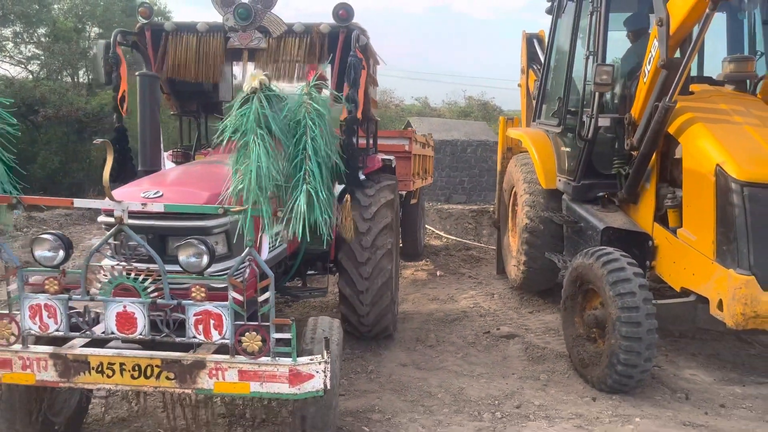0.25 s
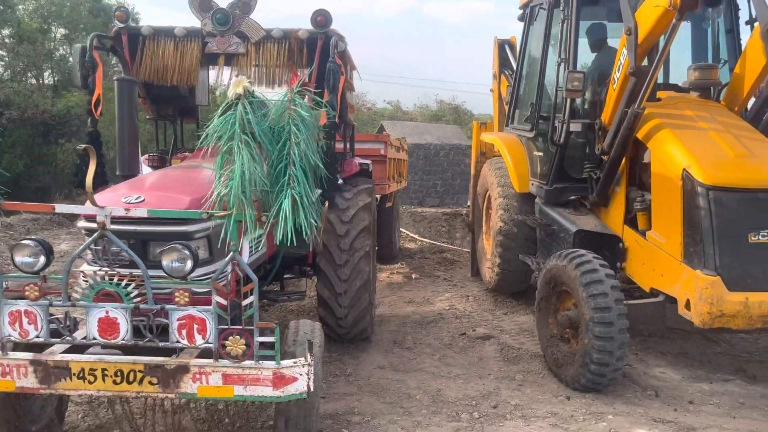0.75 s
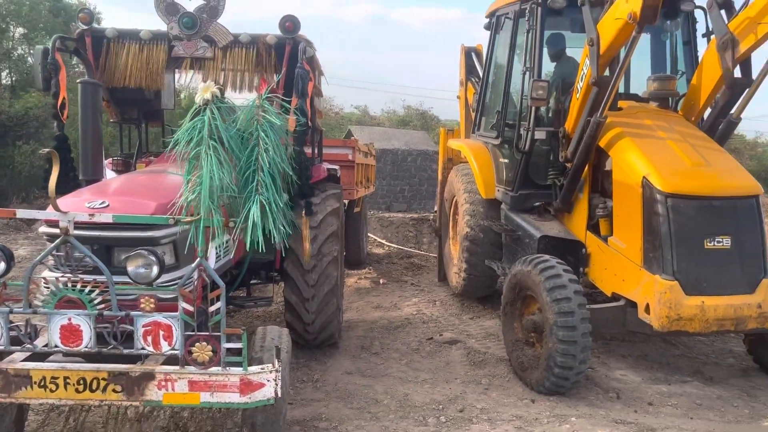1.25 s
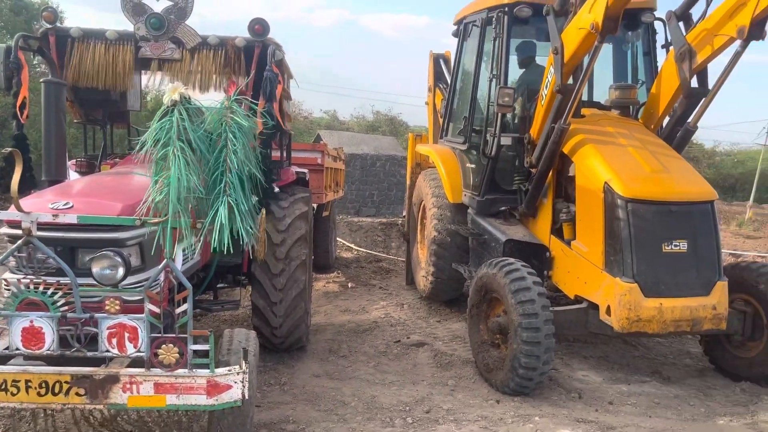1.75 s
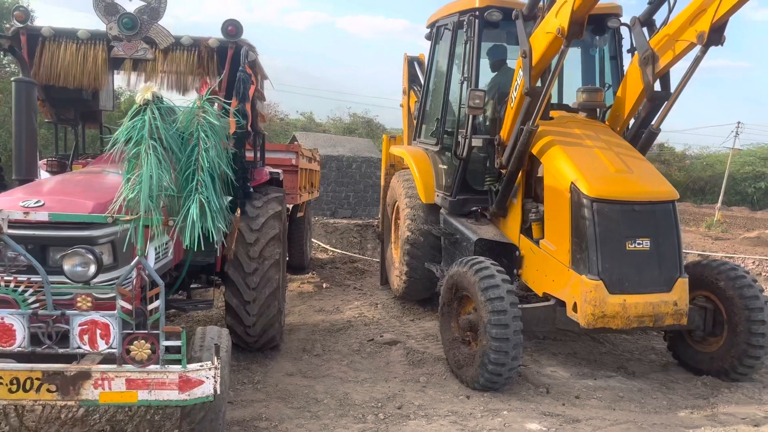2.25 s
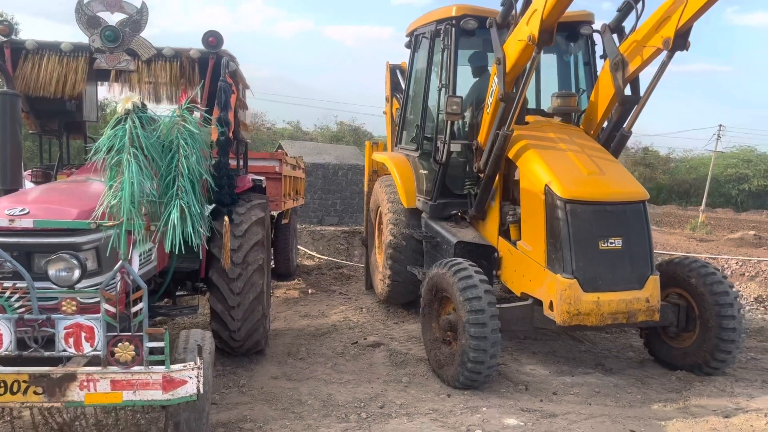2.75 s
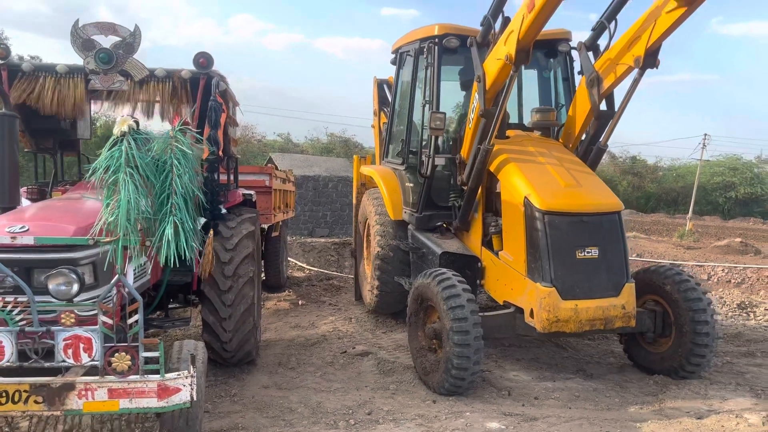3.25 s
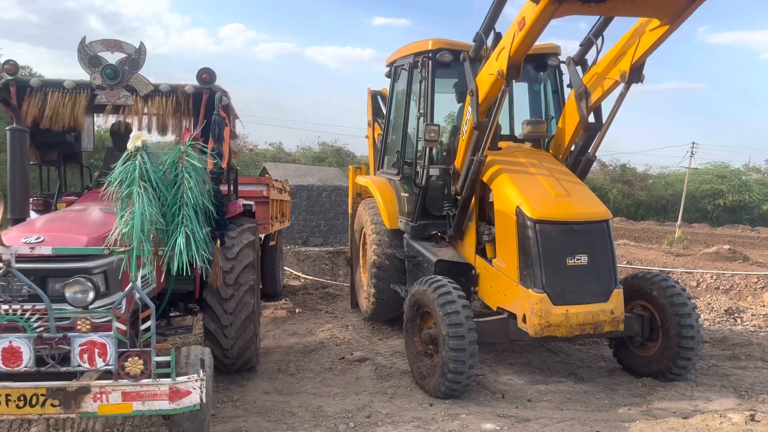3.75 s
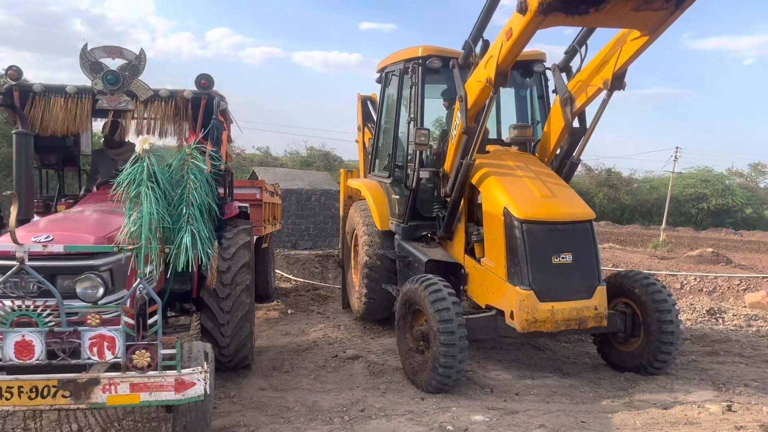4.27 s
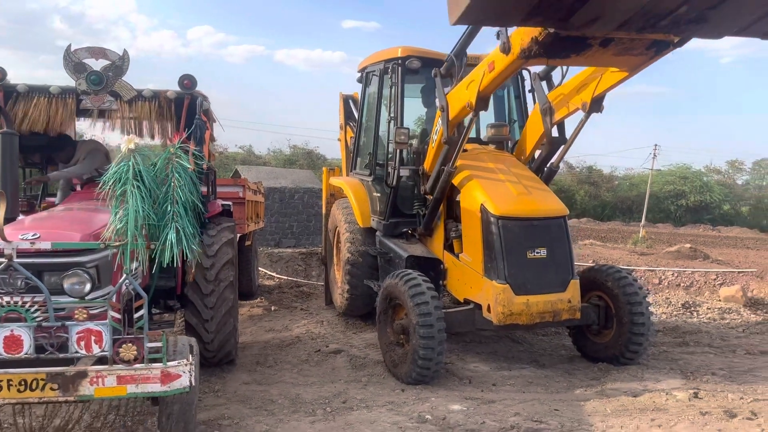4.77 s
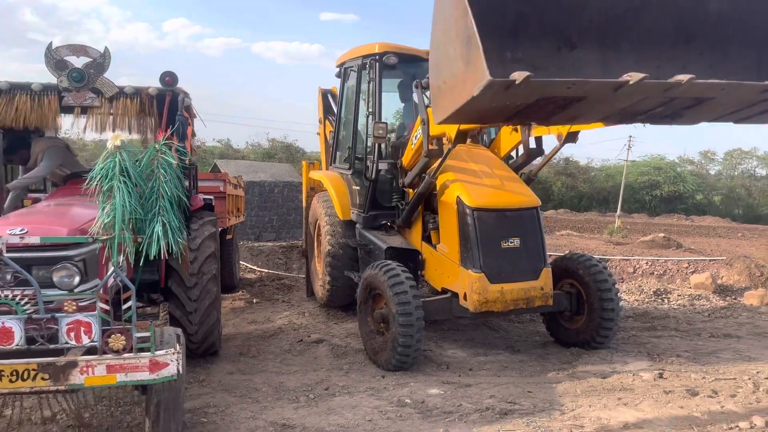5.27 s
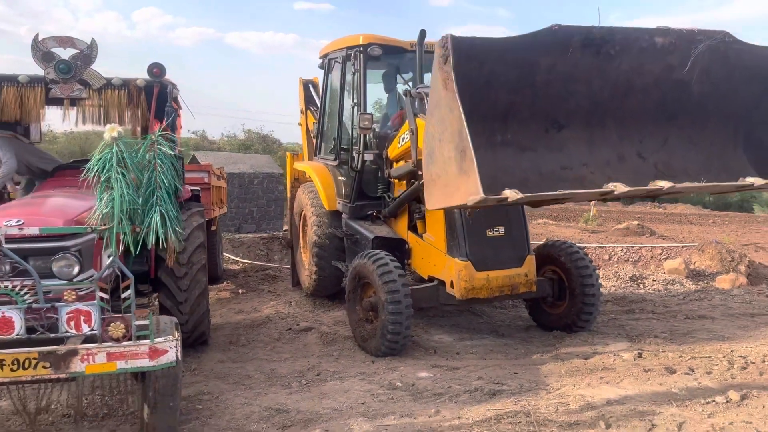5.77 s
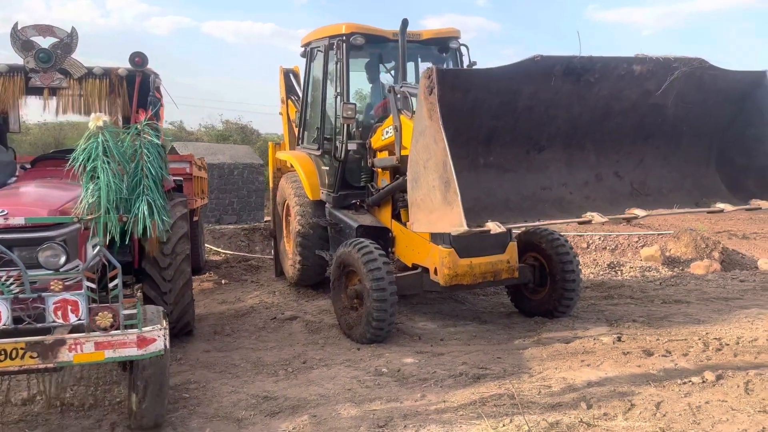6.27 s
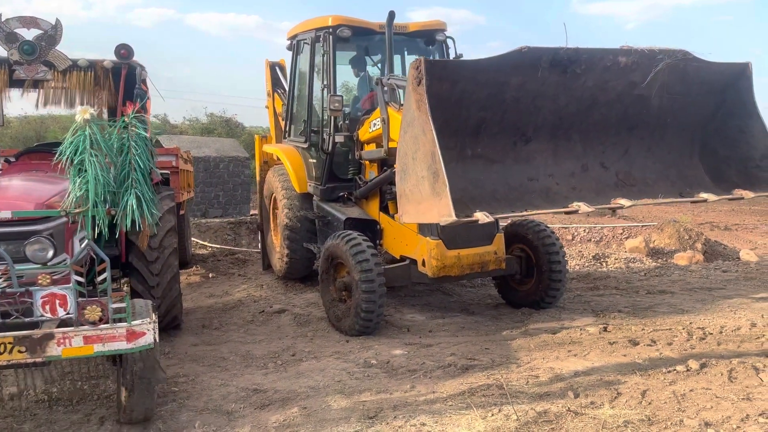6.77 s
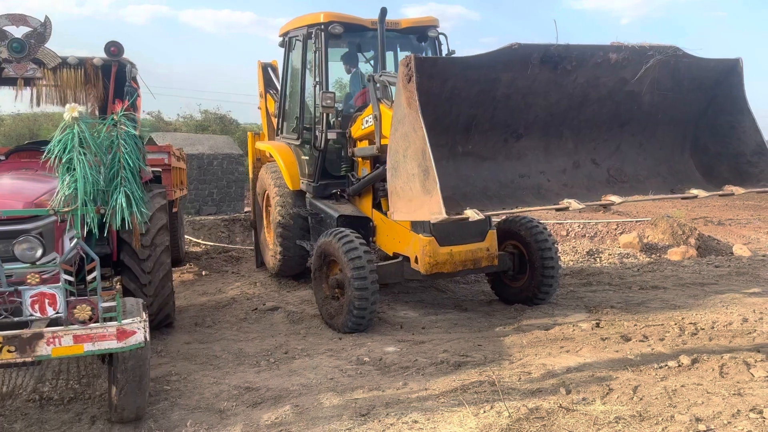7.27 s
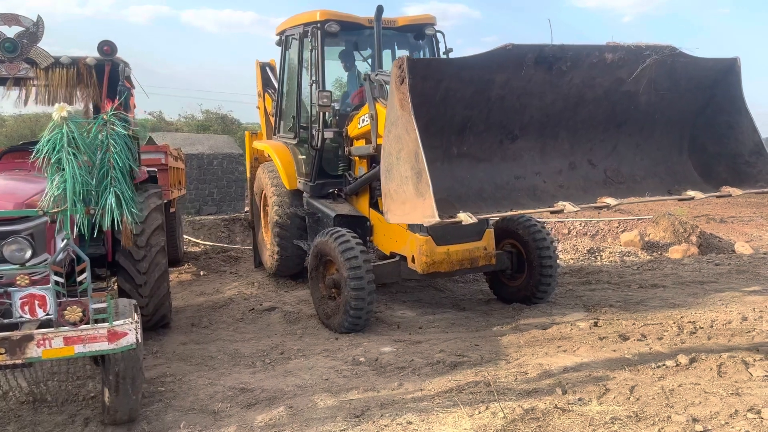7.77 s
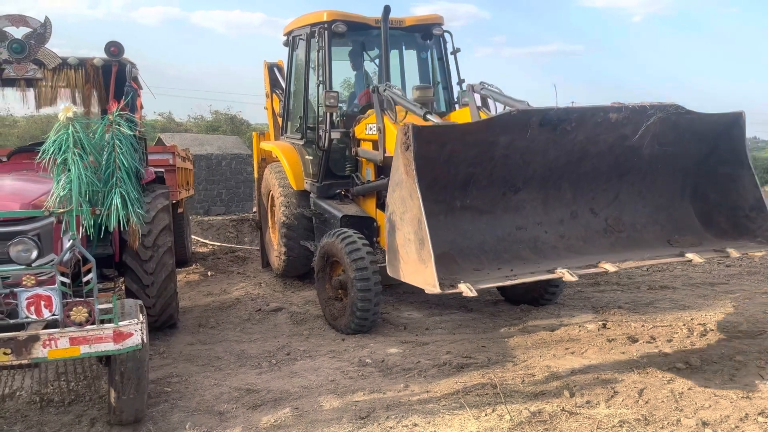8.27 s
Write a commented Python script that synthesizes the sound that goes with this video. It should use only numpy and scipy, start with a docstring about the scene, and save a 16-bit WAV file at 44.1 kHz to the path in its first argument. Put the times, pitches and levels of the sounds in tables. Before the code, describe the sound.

A diesel engine runs down almost to a stall, its valves chattering and steel knocking as it slows. It catches with a few hard barks and a clank, then settles into a thudding, clattering idle. Faint hydraulic tones and a thin squeak come in as the backhoe loader's arms move, followed by several steel clunks. Tiny metal ornaments tinkle on a tractor alongside. Heard from nearby, outdoors on a dirt site.

```python
"""A diesel runs down almost to a stall, catches with a few hard barks and a clank, then settles into
a thudding idle that labours under a hydraulic pump. Each firing knocks in the block and puffs out
of the exhaust. Steel knocks and clunks come from the slowing engine and a backhoe loader; oil sings
in the valves, something squeaks in time with the engine, and the lowered bucket screens the knock.
Small metal trinkets tinkle on a decorated tractor beside the loader."""
import sys
import numpy as np
from scipy.fft import rfft, irfft
from scipy.io import wavfile

SR = 44100
rng = np.random.default_rng(int(sys.argv[2]) if len(sys.argv) > 2 else 0)


def to_wav(sig):
    """Store sig (one row per channel, or 1-D mono) as 16-bit WAV at the path in sys.argv[1].

    Samples outside -1..1 are clipped; the rate is SR.
    """
    pcm = np.clip(np.atleast_2d(sig), -1, 1) * 32767
    pcm = np.round(pcm).astype(np.int16)
    wavfile.write(sys.argv[1], SR, pcm.T)  # frames by channels


N = 375732
TIME = np.arange(N) / SR
FREQS = np.maximum(np.arange(N // 2 + 1) * SR / N, 1)

# engine block resonances: pitch_hz, width_hz, gain_db
BLOCK_RINGS = [(831, 12, 5.5), (1178, 120, 6), (1335, 21, 0.5), (1676, 67, 3), (2320, 100, -13)]


def running_down():
    """Fuel cut: friction slows the diesel steadily; the growl ends and the valve gear chatters."""
    # spectra: freq_hz, gain_db
    body_colour = [(20, -30), (50, 4.5), (110, 3.5), (180, -2.5), (450, 1), (1000, -0.5), (1550, -2.5),
                   (2500, -5), (3400, -10), (4500, -16), (6000, -18.5), (11000, -24.5), (15000, -28)]
    growl_colour = [(40, -20), (130, -16), (250, 2), (600, -1), (1000, -7), (1300, 0.5), (1550, -11),
                    (3000, -9), (6000, -24)]
    valve_colour = [(500, -19), (1700, 5.5), (2600, 3.5), (3200, 1), (3800, -3.5), (5000, -10.5),
                    (6500, -14), (12000, -52)]
    drone_colour = [(30, -1), (60, 1.5), (100, 3), (150, 1), (250, 2.5)]
    # resonances: pitch_hz, width_hz, gain_db
    body_rings = [(362, 18, -9), (636, 42, 1), (900, 16, 6.5), (1157, 26, 8.5), (1275, 15, 3.5)]
    growl_rings = [(357, 31, 0.5), (480, 13, -11), (634, 60, 6.5), (910, 7.8, 18.5), (1210, 34, 2),
                   (1287, 26, 7.5)]
    valve_rings = [(1784, 43, -3), (2230, 62, -6.5), (2714, 81, 0.5), (3025, 27, -1), (3160, 80, 7),
                   (3340, 54, 2), (3480, 38, 5), (3840, 37, 4), (4970, 87, -12.5), (5220, 52, -10),
                   (5700, 35, -30)]
    # harmonics 1-6 of the compression rate: level_db
    orders_db = [-19, -12.5, -12, -16.5, -16, -18.5]
    # stereo curves: (freq_hz, likeness), (freq_hz, balance_db), (freq_hz, left_lead_rad)
    image = ([(60, 1), (400, .88), (1200, .8), (1550, .6), (2400, .7), (4500, .45), (6500, .5), (8000, .95),
             (15000, .9)], [(100, 0), (600, 2.5), (1400, 0), (3100, 6), (6000, 2), (8000, 0)], [(100, 0),
             (1210, .7), (1550, 2.6), (1810, .4), (3450, 1.6), (4300, 1.8), (4700, .3), (6600, -.9),
             (7800, -3), (9000, -3.3), (10800, -6), (13000, -6.5), (14700, -9.2)])
    full_hz, crawl_hz, cut_s, loss_hz_per_s = 34.7, 8, 0.485, 16.76
    rate_hz = np.clip(full_hz - loss_hz_per_s * (TIME - cut_s), crawl_hz, full_hz)
    phase, speed = np.cumsum(rate_hz) / SR, rate_hz / full_hz
    fuel = 1 - ramp(cut_s, 0.32)
    depth = 0.56 - 0.11 * speed  # single compressions stand out as it slows
    beat = depth * (rms_one(each_cycle(phase, rise=0.25, uneven_db=0.7)) ** 2 - 1)
    body = response(body_colour, body_rings + valve_rings)
    treble = 1 / (1 + (1500 / FREQS) ** 4)
    clatter = through(np.sqrt(1 + beat) * grit(grain_db=0.2), body * np.sqrt(treble))
    roar = through(np.sqrt(1 + 0.5 * beat) * grit(grain_db=1), body * np.sqrt(1 - treble))
    combustion = engine_grit(phase, rate_hz, cylinders=1, alike=0.7, grain_db=1)
    growl = through(combustion, response(growl_colour, growl_rings + valve_rings))
    valve_gear = response(valve_colour, [(hz, width, db + 6.5) for hz, width, db in valve_rings])
    taps = each_cycle(phase - 0.08, rise=0.17, uneven_db=0.6) * grit(grain_db=1.2)
    chatter = through(rms_one(taps), valve_gear)
    orders = sum(from_db(db + 2 * drift(9.6))
                 * np.sin(2 * np.pi * (k * (phase + 0.031 * drift(25.67)) + rng.random()))
                 for k, db in enumerate(orders_db, 1))
    drone = from_db(-22.5) * speed ** 1.6 * through(orders, response(drone_colour))
    pair = (from_db(-26) * speed ** 0.85 * clatter
            + from_db(-29) * speed ** 0.29 * roar
            + from_db(-28) * fuel * growl
            + from_db(-36.5) * (1 - fuel) * speed ** 0.48 * chatter)
    fade = 1 - ramp(2.34, 0.28)  # the idle takes over
    return fade * (to_stereo(pair, image) + drone)


def catching():
    """Over-fuelled firings bark in the pipe, crack in the block, boom in the silencer, shake panels."""
    # first firings: start_s, bark_db, clank_db, crack_db
    firings = [(2.048, -30, -42, -30), (2.118, -27.5, -29, -28), (2.176, -24.5, -20.5, -24),
               (2.217, -22, -26, -24), (2.259, -21, -18.5, -27), (2.29, -18.5, -17, -22),
               (2.322, -19.5, -8, -25), (2.358, -26, -37, -29)]
    # spectra: freq_hz, gain_db
    bark_colour = [(80, 12), (165, 14.5), (300, 1), (700, -1), (1200, 2), (1900, -11.5), (3500, -13.5),
                   (5500, -17.5), (8000, -22.5), (15000, -29.5)]
    crack_colour = [(300, -12), (900, -4), (1500, 8), (2400, 8), (3300, -8), (5500, -16), (8000, -24),
                    (15000, -32)]
    starts_s, bark_db, clank_db, crack_db = np.transpose(firings)
    rises_s = 0.22 * np.gradient(starts_s)
    bark_env = sum(from_db(db) * burst(TIME - s, rise) for s, db, rise in zip(starts_s, bark_db, rises_s))
    barks = through(bark_env * grit(grain_db=0), response(bark_colour))
    crack_env = sum(from_db(db) * ramp(s, 0.0046) * decay(s, t60_s=0.046)
                    for s, db in zip(starts_s, crack_db))
    cracks = through(crack_env * grit(grain_db=1.5), response(crack_colour, BLOCK_RINGS))
    boom_db = -11 - 16 * np.exp((starts_s[0] - starts_s) / 0.066)  # builds to full strength
    booms = sum(from_db(db) * puff(TIME - s - 0.017, pitch_hz=73.7, length_s=0.061)
                for s, db in zip(starts_s, boom_db))
    softness_db = np.minimum(clank_db.max() - clank_db, 10)
    clanks = sum(clank(*hit) for hit in zip(starts_s, clank_db, softness_db))
    return barks + cracks, booms + clanks


def clank(start_s, level_db, softness_db):
    """The lurching engine strikes the bodywork; softer blows favour the upper modes."""
    # panel modes: pitch_hz, level_db, t60_s
    modes = [(492, 0.5, 0.12), (694, -8, 0.1), (802, -9, 0.097), (1063, -3.5, 0.066), (1222, -7.5, 0.13),
             (1720, -18, 0.081), (2260, -25, 0.079)]
    start = int(start_s * SR)
    age_s = np.maximum(TIME - start_s, 0)[start:start + SR // 2]
    ring = 0
    for hz, db, t60_s in modes:
        tilt_db = 0.17 * softness_db * min(np.log2(hz / modes[0][0]), 1)
        envelope = from_db(db + tilt_db - 60 * age_s / t60_s)
        ring += envelope * np.sin(2 * np.pi * (hz * age_s + rng.random()))
    attack = np.clip(age_s / 0.0029, 0, 1)
    return np.pad(from_db(level_db) * attack * ring, (start, N))[:N]


def idle_motion():
    """Firing rate, firing count and load (0-1), which shows as the pump dragging the speed down."""
    # idle speed: time_s, firing_hz
    speeds = [(2.38, 32.923), (3, 32.258), (3.6, 32.288), (4.2, 31.785), (5.8, 31.65), (6.2, 31.949),
              (8.5, 31.854)]
    free_hz, loaded_hz = 32.3, 31.7
    rate_hz = np.interp(TIME, *np.transpose(speeds))
    phase = np.cumsum(rate_hz * (TIME > speeds[0][0])) / SR
    load = np.clip((free_hz - rate_hz) / (free_hz - loaded_hz), 0, 1)
    return rate_hz, phase, load


def exhaust_thuds(rate_hz, phase, load):
    """One exhaust thud per firing, harder under load; strong and weak cylinders make the idle lope."""
    # thud of each cylinder: level_db
    lope_db = [1.35, -1.55, 0.35, -0.95]
    turn = phase.astype(int)
    strength = from_db(np.resize(lope_db, 600) + 0.65 * rng.standard_normal(600))
    pitch_hz = 74.4 + 4.8 * load  # hotter gas swings faster
    thuds = sum(strength[turn + k] * puff((phase - turn - k - 0.656) / rate_hz, pitch_hz, length_s=0.058)
                for k in (-1, 0, 1))
    fundamental = from_db(-18.5) * np.cos(2 * np.pi * (phase - 0.72))
    hum = from_db(-20.5 - 12.5 * load + 2.3 * drift(7.5)) * np.sin(2 * np.pi * 5 * phase)
    return from_db(-26 + 3 * load) * rms_one((phase > 0) * (thuds + fundamental + hum))


def idle_clatter(rate_hz, phase, load):
    """Ignition crack, block knock, piston slap and pipe rasp per firing, over a wash of gears and fan."""
    # spectra: freq_hz, gain_db
    ignition_colour = [(400, 0), (1000, 0), (1800, 1), (2600, 1.5), (3200, -9), (4400, -8.5), (5600, -21.5),
                       (8000, -19), (15000, -11)]
    knock_colour = [(200, 1), (800, 7), (1400, 2), (2500, 4.5), (3200, -1), (4500, -5.5), (5600, -12.5),
                    (7500, -13.5), (10000, -31), (15000, -18.5)]
    slap_colour = [(200, -37), (480, 11), (850, -10.5), (1200, 2), (1600, -12.5), (4000, -11.5),
                   (8000, -70)]
    rasp_colour = [(20, -26), (45, 9.5), (100, 5), (160, 3.5), (220, 3.5), (400, -2.5), (650, -6.5),
                   (950, -9.5), (1500, -13), (4000, -32)]
    # exhaust pipe resonances: pitch_hz, width_hz, gain_db
    pipe_rings = [(306.4, 7.3, 8.5), (477, 21, 0), (559, 22, 9), (632, 66, -5)]
    # grit that repeats per cylinder: knock_share, slap_share, rasp_share
    shares = [.35, .7, .5]
    running = phase > 0
    knock_grit, slap_grit, rasp_grit = (engine_grit(phase, rate_hz, cylinders=4, alike=share, grain_db=1.4)
                                        for share in shares)
    crack_env = each_cycle(phase + 0.078, rise=0.11, uneven_db=1, pattern_db=[-0.17, 0.5, -0.5, 1])
    knock_env = each_cycle(phase + 0.072, rise=0.24, uneven_db=1.2, pattern_db=[0.14, -1.3, -0.44, 0.57])
    wash = from_db(-0.5) * grit(grain_db=2)
    slap_env = each_cycle(phase - 0.15, rise=0.09, uneven_db=1, pattern_db=[1.5, -1, -1.5, -2.5])
    rasp_env = each_cycle(phase - 0.1, rise=0.35, uneven_db=0.5, pattern_db=[1.5, -1.5, 1, -1])
    bucket_db = -2 * ramp(5.17, 1.6)  # the lowered bucket screens the block
    block = sum(through(from_db(db + bucket_db) * rms_one(running * drive), response(colour, BLOCK_RINGS))
                for drive, db, colour in [(crack_env * knock_grit, -48, ignition_colour),
                                          (knock_env * knock_grit + wash, -38.5, knock_colour),
                                          (slap_env * slap_grit, -42.5, slap_colour)])
    rasp = from_db(-35 - 0.1 * load) * rms_one(running * (rasp_env + from_db(-4)) * rasp_grit)
    return block + through(rasp, response(rasp_colour, pipe_rings))


def steel_clunks():
    """Steel knocks and clunks from the slowing engine and the loader, each followed by a thump."""
    # clunks: start_s, crash_db, t60_s, centre_hz, spread_octaves, thump_db
    hits = [(1.655, -18.5, 0.12, 1390, 0.43, -38), (1.989, -27, 0.042, 1500, 1, -57),
            (2.048, -25, 0.082, 1400, 0.46, -45), (2.77, -41, .08, 5170, 0.27, -55),
            (4.805, -26, .045, 750, 0.88, -54), (6.128, -33.5, 0.19, 1010, 1.1, -31),
            (6.231, -30.5, 0.17, 696, 1.1, -36), (6.627, -33, .13, 900, 0.59, -50),
            (7.219, -25, 0.14, 2040, 0.66, -41), (7.236, -27, 0.24, 700, 1.1, -25.5),
            (8.015, -25.5, 0.048, 700, .7, -52)]
    # steel resonances: pitch_hz, width_hz, gain_db
    steel_rings = [(680, 190, 11), (1017, 30, -6), (1380, 41, 3), (1620, 40, 3), (2180, 30, -1),
                   (3250, 29, -10)]
    crashes, shudder = 0, 0
    for s, db, t60_s, centre_hz, spread_octaves, thump_db in hits:
        colour = [(centre_hz * 2 ** (k * spread_octaves), -3 * k * k) for k in range(-5, 6)]
        envelope = from_db(db) * ramp(s, 0.0039) * decay(s, t60_s)
        crashes += through(envelope * rng.standard_normal((2, N)), response(colour, steel_rings))
        shudder += from_db(thump_db) * decay(s + 0.026, t60_s=0.36)
    return crashes, shudder * unsteady_tone(pitch_hz=160, width_hz=25)


def trinkets(ring_t60_s=0.15, click_t60_s=0.049, reach_hz=350, detune=0.0058):
    """Tiny metal ornaments click together and ring very high; each touch favours a few modes."""
    # clearest touches: start_s, level_db, centre_hz
    touches = [(0.795, -26, 13900), (0.805, -30.5, 10060), (1.071, -30, 9600), (1.2151, -36, 14400),
               (1.679, -34, 10300), (2.0313, -35.5, 14700), (2.4962, -36, 13900), (2.92, -42, 9400),
               (3.3016, -35, 9940), (3.32, -34, 9300), (3.335, -34, 14200), (4.1674, -40, 13800),
               (4.955, -42, 13900), (4.995, -42, 10300), (5.36, -42, 9550), (5.7494, -40, 11300),
               (6.49, -36, 13900), (6.59, -42, 11300), (7.25, -44, 14600), (7.71, -50, 8840),
               (8.4188, -40, 14100)]
    # ornament modes: pitch_hz
    modes_hz = [9220, 9200, 9580, 10210, 10490, 11280, 12140, 13600, 14360, 14700]
    faint_per_s, faint_db = 3.6, -45.5
    faint = [(when * N / SR, faint_db, modes_hz[int(which * len(modes_hz))])
             for when, which in rng.random((int(faint_per_s * N / SR), 2))]
    out, age_s = np.zeros((2, N + SR)), np.arange(SR // 3) / SR
    attack = np.clip(age_s / 0.0046, 0, 1)
    for s, db, centre_hz in touches + faint:
        hz = np.array(modes_hz)[:, None] * (1 + detune * rng.standard_normal())
        favour = np.exp(-((hz - centre_hz) / reach_hz) ** 2 / 2) + from_db(-19)
        weight = favour * from_db(2.4 * rng.standard_normal(hz.shape))
        modes = np.sin(2 * np.pi * (hz * age_s + rng.random((2, len(hz), 1))))
        ring = (weight / np.linalg.norm(weight) * modes).sum(axis=1) * from_db(2 - 60 * age_s / ring_t60_s)
        scrape = np.diff(rng.standard_normal((2, len(age_s) + 2)), 2)
        click = scrape * from_db(-6 - 60 * age_s / click_t60_s)
        start = int(s * SR)
        out[:, start:start + len(age_s)] += from_db(db) * attack * (ring + click)
    return out[:, :N]


def hydraulics():
    """Oil sings through pump and valves in narrow, unsteady tones as the loader arms move."""
    # oil tones: start_s, loudest_s, end_s, pitch_hz, width_hz, level_db
    tones = [(0.56, 0.56, 1.39, 251, 7.4, -37.5), (3, 4.7, 5.9, 847, 8.9, -47),
             (2.4, 3.8, 4.7, 1370, 27, -44), (4.9, 6.7, 8.6, 568, 11, -44.5)]
    return sum(from_db(db) * unsteady_tone(hz, width_hz) * np.interp(TIME, times_s, [0, 1, 0])
               for *times_s, hz, width_hz, db in tones)


def squeak(phase, wander_hz=44.2):
    """A thin metallic squeak pulses with the shake of the engine."""
    # squeak contour: time_s, level_db, pitch_hz
    contour = [(2.9, -69, 4570), (3.3, -56, 4560), (4.2, -53, 4580), (4.35, -46, 4605), (4.5, -44.5, 4610),
               (4.66, -57, 4640), (4.8, -62, 4620), (5.2, -60, 4620), (5.7, -53, 4600), (6.1, -61, 4650),
               (6.8, -60, 4640), (8.5, -57, 4700)]
    times_s, db, hz = np.transpose(contour)
    pulses = each_cycle(phase, rise=0.14, uneven_db=6)
    level_db = np.interp(TIME, times_s, db, left=-np.inf)
    pitch_hz = np.interp(TIME, times_s, hz) + wander_hz * drift(150)
    return from_db(level_db) * pulses * np.sin(2 * np.pi * np.cumsum(pitch_hz) / SR)


def puff(age_s, pitch_hz, length_s):
    """One gas slug swings the silencer for a few cycles, with peak suction at age zero."""
    window = np.cos(np.pi * np.clip(age_s / length_s, -0.5, 0.5)) ** 4.1 * (abs(age_s) < length_s / 2)
    return -np.cos(2 * np.pi * pitch_hz * age_s) * window


def each_cycle(phase, rise, uneven_db, pattern_db=(0,)):
    """One burst of uneven strength per turn of phase, tails overlapping; rise in turns."""
    turn = np.maximum(np.floor(phase), 0).astype(int)
    strength = from_db(np.resize(pattern_db, 600) + uneven_db * rng.standard_normal(600))
    age = phase - turn
    tail = (turn > 0) * strength[turn - 1] * burst(age + 1, rise)
    return np.hypot(strength[turn] * burst(age, rise), tail)


def engine_grit(phase, rate_hz, cylinders, alike, grain_db):
    """Grit whose share `alike` repeats whenever the same cylinder fires, giving the engine orders."""
    stroke = int(SR / rate_hz.max())
    size = cylinders * stroke
    imprint = rms_one(irfft(np.exp(2j * np.pi * rng.random((2, size // 2 + 1))), size))
    place = (np.floor(phase) * stroke + phase % 1 * SR / rate_hz).astype(int) % size
    return np.sqrt(alike) * imprint[:, place] + np.sqrt(1 - alike) * grit(grain_db)


def grit(grain_db):
    """Two independent noises of tiny, uneven impacts; unit rms."""
    noise = rng.standard_normal((2, N))
    grains = np.repeat(rng.standard_normal(N // 32 + 1), 32)[:N]
    return rms_one(noise * from_db(grain_db * grains))


def unsteady_tone(pitch_hz, width_hz):
    """Noise in one narrow resonance; unit rms."""
    return rms_one(through(rng.standard_normal(N), 1 / (1 + ((FREQS - pitch_hz) / width_hz) ** 2)))


def burst(age, rise):
    """Swells to one at `rise`, then dies away."""
    u = np.maximum(age, 0) / rise
    return u * np.exp(1 - u)


def decay(start_s, t60_s):
    """Sudden onset, exponential fall."""
    age_s = TIME - start_s
    return (age_s > 0) * from_db(-60 * np.clip(age_s / t60_s, 0, 4))


def ramp(start_s, length_s):
    """Linear rise from zero to one."""
    return np.clip((TIME - start_s) / length_s, 0, 1)


def drift(rate_hz):
    """Random wander between knots of unit spread."""
    knots = rng.standard_normal(2000)
    return np.interp(TIME * rate_hz, np.arange(len(knots)), knots)


def response(colour, rings=()):
    """Broad spectrum with resonances on top; unit power gain."""
    peaks = sum(from_db(db) / (1 + 1j * (FREQS ** 2 - hz ** 2) / (FREQS * width_hz))
                for hz, width_hz, db in rings)
    gain = from_db(over_hz(colour)) * (1 + peaks)
    return gain / np.sqrt(np.mean(abs(gain) ** 2))


def over_hz(points):
    """Interpolate a curve over log frequency."""
    hz, value = np.transpose(points)
    return np.interp(np.log(FREQS), np.log(np.maximum(hz, 1)), value)


def through(x, gain):
    """Filter by a frequency response."""
    return irfft(rfft(x) * gain, N)


def to_stereo(pair, image):
    """Mix a shared and a differing part into left and right, with level and phase offsets."""
    likeness, balance_db, lead_rad = (over_hz(points) for points in image)
    side = np.array([[1], [-1]])
    shared, differing = rfft(pair)
    channels = np.sqrt((1 + likeness) / 2) * shared + side * np.sqrt((1 - likeness) / 2) * differing
    return irfft(channels * from_db(side * balance_db / 2) * np.exp(0.5j * side * lead_rad), N)


def from_db(db):
    """Decibels to gain."""
    return 10 ** (np.asarray(db) / 20)


def rms_one(x):
    """Scale to unit rms."""
    return x / np.sqrt(np.mean(x ** 2) + 1e-20)


def scene():
    """Engine, loader and trinkets: noisy parts spread in stereo; thuds, clanks and tones centred."""
    # stereo curves: (freq_hz, likeness), (freq_hz, balance_db), (freq_hz, left_lead_rad)
    image = ([(60, .99), (400, .97), (1200, .94), (1550, .6), (1900, .93), (3000, .88), (4500, .65),
             (6500, .6), (8000, .95), (15000, .9)], [(100, 0), (1000, 0), (2000, 1.5), (4000, 2.5),
             (7000, 0)], [(100, 0), (1350, -.1), (1550, -1.5), (1750, 0), (4800, .2), (6600, -1),
             (7800, -3), (9000, -3.3), (10500, -5.9), (13000, -6.5), (14700, -9.1)])
    rate_hz, phase, load = idle_motion()
    barks_and_cracks, booms_and_clanks = catching()
    crashes, thumps = steel_clunks()
    centred = booms_and_clanks + exhaust_thuds(rate_hz, phase, load) + squeak(phase) + thumps + hydraulics()
    slowing = running_down()
    spread = barks_and_cracks + idle_clatter(rate_hz, phase, load) + crashes + trinkets()
    return slowing + centred + to_stereo(spread, image)


def record(dry):
    """Soft saturation, then a steep low-pass."""
    cutoff_hz = 15650
    rounded = 1.34 * np.tanh(dry / 1.252)
    return through(rounded, 1 / (1 + (FREQS / cutoff_hz) ** 300))


dry = scene()
out = record(dry)
to_wav(out)
```